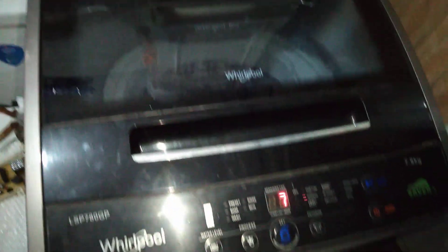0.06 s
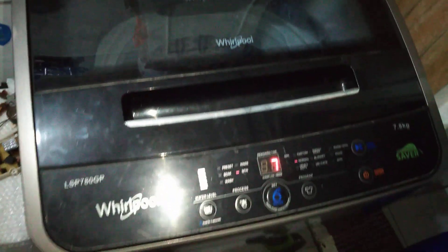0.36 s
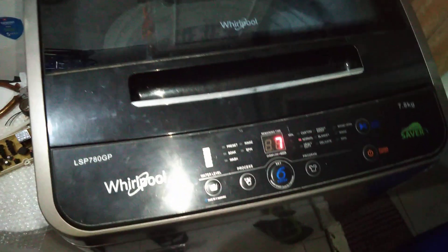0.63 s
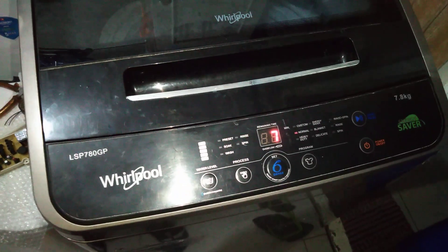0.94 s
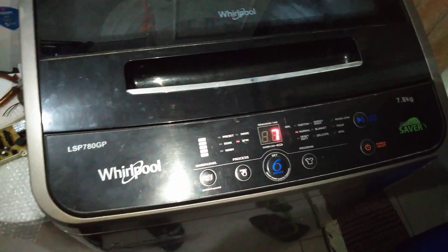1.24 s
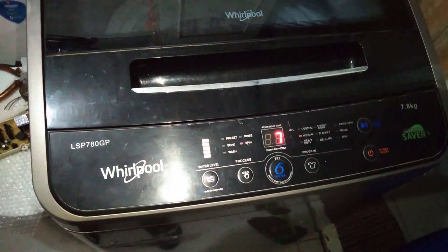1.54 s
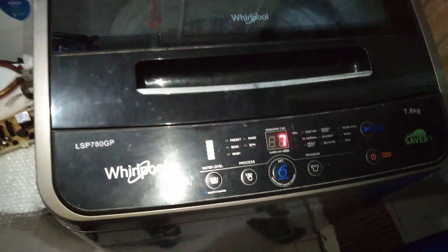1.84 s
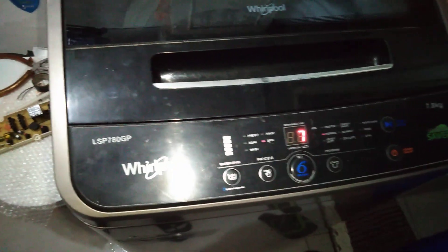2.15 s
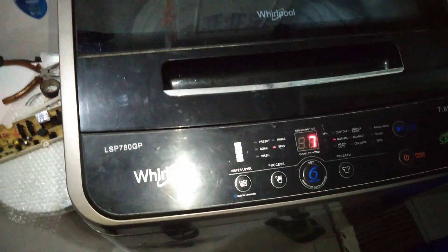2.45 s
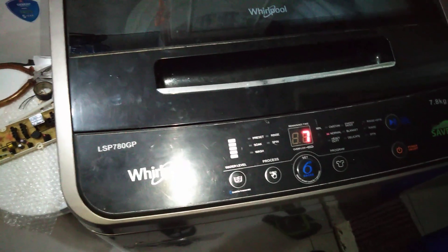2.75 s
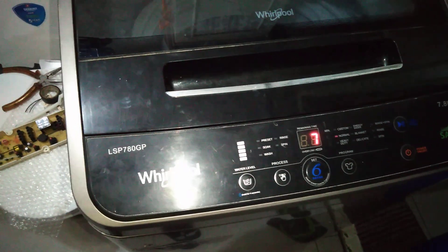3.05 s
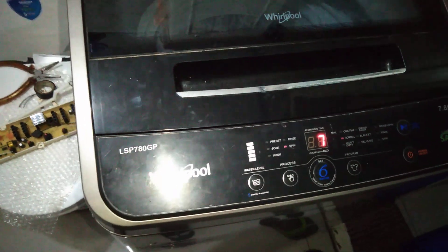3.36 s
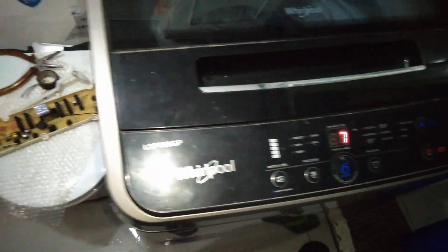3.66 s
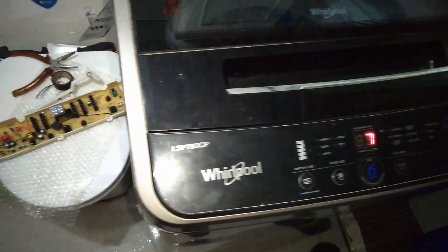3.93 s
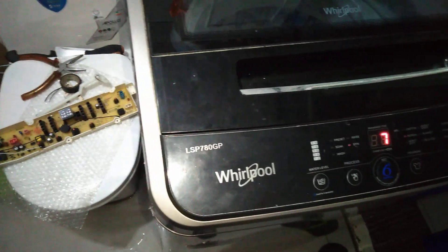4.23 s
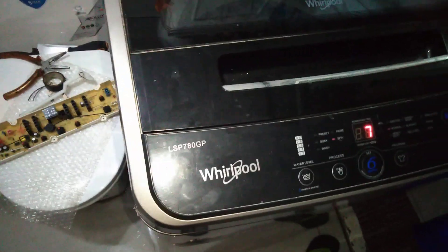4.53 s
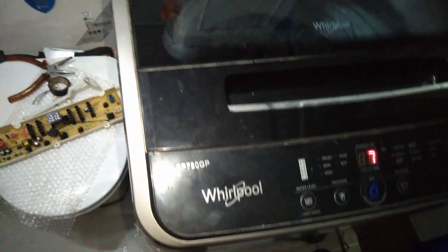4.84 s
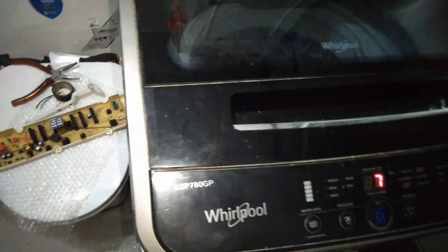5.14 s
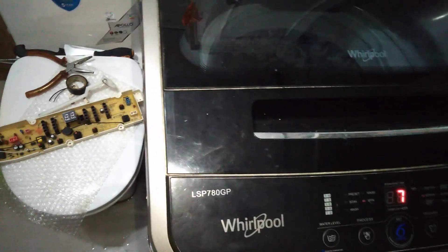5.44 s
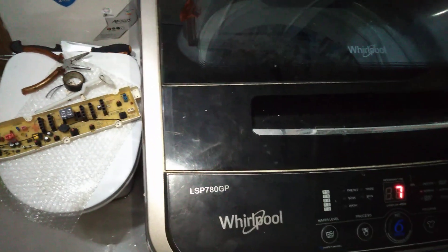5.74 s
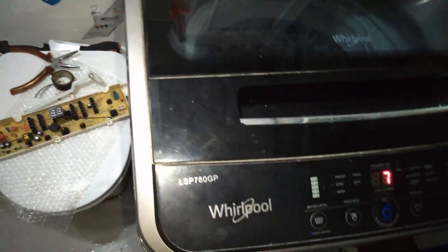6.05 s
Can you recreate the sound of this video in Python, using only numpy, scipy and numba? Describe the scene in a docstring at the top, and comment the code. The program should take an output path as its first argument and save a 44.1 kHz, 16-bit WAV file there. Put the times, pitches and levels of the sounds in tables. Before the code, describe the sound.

Heard from above a washing machine in a small room with hard walls, drain water gushes and slaps onto the wet floor. The hose rumbles in surges, with deep glugs and a very quiet motor hum. Halfway through, the stream weakens into a lighter, sputtering trickle that nearly stops twice and picks up again, with separate glugs sounding between the drips and splashes.

```python
"""Water from a draining top-load washing machine splashes on the wet floor of a small hard-walled room.
Each splash traps air bubbles, and each bubble rings like a tiny bell: the smaller, the higher.
Air pockets churn in the hose, big bubbles glug and the motor hums, all heard from above the lid.
After three seconds the flow eases to a patter with single glugs."""
import sys
import numpy as np
from scipy import signal
from scipy.fft import rfft, irfft, next_fast_len
from scipy.io import wavfile
from scipy.ndimage import uniform_filter1d
from numba import njit

SR = 44100
rng = np.random.default_rng(int(sys.argv[2]) if len(sys.argv) > 2 else 0)


def to_wav(sig):
    """Store sig (one row per channel, or 1-D mono) as 16-bit WAV at the path in sys.argv[1].

    Samples outside -1..1 are clipped; the rate is SR.
    """
    pcm = np.clip(np.atleast_2d(sig), -1, 1) * 32767
    pcm = np.round(pcm).astype(np.int16)
    wavfile.write(sys.argv[1], SR, pcm.T)  # frames by channels


N = 268569
TIME = np.arange(N) / SR

# the outflow, which thins as the tub empties and twice nearly fails: time_s, flow_share (1 is full)
FLOW = [(0, 0.85), (1.45, 1), (2.2, 0.73), (2.8, 0.32), (3.2, 0.32), (4.15, 0.29), (4.36, 0.15),
        (4.42, 0.01), (4.6, 0.25), (4.92, 0.5), (5.36, 0.07), (5.49, 0), (5.6, 0.23), (6.09, 0.22)]
# pitch of the largest bubbles the stream traps; each gush pulls it down: time_s, pitch_hz
LOWEST_PITCH = [(0, 2420), (.19, 2400), (.27, 1850), (.35, 1600), (.46, 2500), (.58, 2280), (.66, 1470),
                (.77, 1560), (.85, 2400), (.9, 1850), (1.06, 2010), (1.11, 1440), (1.35, 1500),
                (1.43, 2350), (1.57, 2320), (1.7, 1770), (1.85, 1900), (1.93, 1490), (2.1, 1950),
                (2.3, 1600), (2.65, 1750), (2.88, 2730), (3.05, 3270), (3.4, 2600), (3.7, 2500),
                (3.86, 5300), (3.95, 2210), (4.3, 2630), (4.39, 5570), (4.71, 6000), (4.8, 1760),
                (5.03, 2040), (5.25, 5250), (5.32, 2920), (5.48, 6270), (5.56, 3000), (5.78, 2650),
                (5.96, 4750)]
# level of the coarse bubbles, mostly faint once the hose runs half empty: time_s, level_db
COARSE_LEVEL = [(0, -36), (.14, -41), (.3, -36), (.52, -40.5), (.72, -34.5), (1.05, -34), (1.22, -35.5),
                (1.3, -41), (1.5, -37), (1.95, -34.5), (2.2, -37), (2.45, -42), (2.7, -48), (2.92, -44),
                (3.04, -68), (3.8, -54), (4.45, -51.5), (4.68, -40.5), (4.88, -42), (5.03, -56),
                (5.45, -67), (6.09, -56)]
# level of the high crackle of the finest droplets: time_s, level_db
FIZZ_LEVEL = [(0, -40), (.1, -49), (.25, -44), (.48, -50), (.55, -46), (.67, -57), (.8, -42), (.97, -54),
              (1.15, -54), (1.35, -43), (1.5, -40.5), (1.95, -53), (2.04, -42), (2.35, -52), (2.67, -51.5),
              (3.1, -49), (3.25, -48), (3.52, -48), (3.6, -71), (3.67, -40), (3.76, -49), (3.92, -47),
              (4.2, -48), (4.29, -68), (4.36, -46), (4.44, -56), (4.52, -44.5), (4.78, -53), (4.97, -50),
              (5.2, -50.5), (5.46, -55), (5.58, -45.5), (5.75, -54), (5.8, -48), (6.09, -54)]
# loud slaps of water, each a cloud of bubbles: start_s, level_db, centre_hz, spread_octaves
SLAPS = [(.002, -32.5, 7550, 0.3), (.167, -34, 6840, 0.2), (0.2, -34, 4590, 0.44), (.258, -47, 2310, 0.11),
         (.328, -38, 2267, .15), (0.331, -31.5, 8280, 0.25), (.366, -34.5, 3350, 0.013),
         (0.417, -33.5, 6760, .15), (0.485, -56.5, 1530, 0.037), (.55, -33.5, 9450, 0.12),
         (0.557, -54, 1650, 0.044), (.586, -33.5, 6500, 0.11), (.65, -33.5, 2710, 0.19),
         (0.662, -45, 1625, 0.071), (0.755, -28.5, 5320, 0.31), (0.763, -37, 2640, 0.056),
         (0.823, -29, 7560, 0.22), (0.833, -28.5, 3520, 0.078), (0.883, -32.5, 2490, 0.2),
         (.955, -50, 2170, 0.053), (1.017, -36, 2460, 0.14), (1.083, -28.5, 8330, 0.26),
         (1.087, -42.5, 1625, 0.07), (1.116, -33, 10500, 0.053), (1.156, -36, 2275, 0.047),
         (1.195, -46.5, 1583, 0.074), (1.234, -46, 2300, 0.46), (1.32, -47.5, 1800, .15),
         (1.33, -31, 6400, 0.39), (1.378, -26, 5580, 0.21), (1.564, -33.5, 7460, 0.31),
         (1.593, -32, 2440, 0.15), (1.662, -31.5, 5960, 0.42), (1.692, -35, 2333, 0.23),
         (1.751, -31, 7700, 0.24), (1.777, -37, 2243, 0.082), (1.929, -36.5, 1857, 0.12),
         (2.044, -53, 2750, 0.25), (2.149, -34, 7580, 0.3), (2.163, -36.5, 2360, 0.083),
         (2.238, -35, 5900, 0.24), (2.287, -39, 2340, 0.07), (2.399, -43.5, 1644, 0.12),
         (2.476, -32, 6040, 0.54), (2.547, -34.5, 7940, 0.27), (2.601, -38.5, 1990, 0.16),
         (2.648, -29, 8650, 0.097), (2.681, -44, 2166, 0.15), (2.692, -43.5, 4440, 0.2),
         (2.755, -32, 8500, 0.084), (2.76, -47.5, 2610, 0.038), (2.823, -51, 1490, 0.021),
         (2.824, -46, 1990, 0.012), (2.825, -51, 3000, 0.12), (2.839, -37, 8700, 0.18),
         (2.858, -45.5, 4700, 0.16), (2.931, -34.5, 8570, 0.19), (2.935, -44.5, 4180, 0.1),
         (2.96, -38, 6380, 0.075), (3.042, -41, 7380, 0.33), (3.095, -50.5, 5250, 0.073),
         (3.134, -42, 9500, .12), (3.162, -52.5, 3125, 0.078), (3.165, -47, 6620, .05),
         (3.255, -46.5, 4250, 0.16), (3.26, -46, 7160, .06), (3.32, -46, 6240, 0.085),
         (3.38, -45.5, 4400, 0.2), (3.473, -46, 5530, 0.13), (3.643, -48.5, 3150, 0.17),
         (3.747, -34.5, 7120, 0.23), (3.776, -45.5, 2860, 0.12), (3.815, -47, 12600, 0.051),
         (3.895, -38.5, 10500, 0.086), (3.9, -48.5, 2260, 0.037), (3.948, -42.5, 2800, 0.21),
         (4.016, -41, 5230, 0.2), (4.166, -36.5, 6470, 0.2), (4.187, -43, 2980, 0.064),
         (4.223, -48, 2570, 0.04), (4.239, -37.5, 5970, 0.089), (4.244, -42, 8870, 0.069),
         (4.312, -40.5, 9370, 0.056), (4.327, -46, 2880, 0.23), (4.466, -36, 9480, 0.21),
         (4.536, -46.5, 3600, 0.014), (4.547, -33.5, 8020, 0.24), (4.675, -34.5, 8000, 0.18),
         (4.8, -43, 3900, 0.51), (4.828, -33.5, 9300, 0.053), (4.864, -48, 4970, 0.27),
         (4.951, -46.5, 2300, 0.125), (4.992, -38.5, 6370, .2), (5.025, -43.5, 4580, 0.16),
         (5.138, -44, 2915, 0.19), (5.148, -38, 7700, 0.21), (5.289, -49, 3740, 0.33),
         (5.306, -42, 9400, 0.15), (5.405, -50, 6120, 0.02), (5.52, -40, 9300, 0.24),
         (5.538, -43.5, 3810, 0.21), (5.563, -36, 7500, 0.15), (5.731, -40, 5730, 0.37),
         (5.768, -44, 2806, 0.021), (5.775, -36, 10150, 0.13), (5.82, -37, 8100, 0.072),
         (5.918, -45, 6200, 0.087), (5.987, -49.5, 4570, 0.013), (6.035, -25.5, 6400, 0.11)]
# sheets of water that land flat and trap no air: start_s, level_db, lowest_hz
SMACKS = [(0.49, -26, 4500), (0.759, -44, 3500), (0.827, -34.5, 2960), (1.084, -43, 5940),
          (1.156, -31, 2300), (1.38, -36, 4530), (1.414, -28.5, 5340), (1.876, -30, 2200),
          (2.242, -57, 3000), (2.4, -34.5, 2070), (2.647, -43, 7200), (3.662, -48, 6300),
          (3.897, -47, 8000), (3.95, -37.5, 5970), (4.947, -31.5, 6560)]
# single bubbles: big ones in the hose and drain, and small ones ringing high in the splashing: start_s,
# peak_db, pitch_hz, ring_s (time to fade by 60 dB)
GLUGS = [(.074, -26, 134.8, 0.32), (0.343, -32, 156.4, 0.6), (0.364, -36, 243.6, 0.14),
         (0.768, -44, 423, 0.28), (.875, -48.5, 498, .13), (1.145, -50.5, 444, 0.11),
         (1.222, -39, 161, 0.05), (1.391, -40, 213, 0.042), (1.454, -46, 430, 0.12),
         (1.805, -50.5, 470, 0.064), (1.93, -50, 449, 0.081), (2.03, -40.5, 820, 0.018),
         (2.3, -53.5, 427, 0.1), (2.405, -45.5, 870, 0.026), (2.619, -39, 840, 0.013),
         (2.825, -52, 866, 0.21), (3.37, -56.5, 629, 0.55), (3.68, -39, 112.6, 0.42),
         (3.71, -48, 1700, .06), (3.745, -49, 1580, 0.052), (3.785, -48, 1510, 0.071),
         (3.986, -40, 411.6, 0.26), (4.106, -46.5, 490, 0.065), (4.107, -44, 119, 0.24),
         (4.427, -36, 120, 0.051), (4.5, -45, 1750, 0.051), (4.522, -44, 2043, 0.027),
         (4.573, -47, 402, 0.06), (4.835, -44, 2190, 0.051), (4.872, -42.5, 408, 0.27),
         (4.89, -41.5, 1960, .06), (4.953, -38.5, 1918, 0.05), (4.985, -44, 2150, 0.061),
         (5.092, -41, 388, 0.14), (5.182, -39.5, 123.2, 0.35), (5.432, -43.5, 366, 0.6),
         (5.699, -36, 116.6, 0.44), (5.94, -35, 119.8, 0.39)]
# surges of air through the hose: start_s, length_s, level_db
SURGES = [(0.015, 0.25, -34), (0.312, 1.08, -34.5), (1.999, 0.18, -39.5), (2.327, 0.4, -43)]
# short sharp ticks: start_s, level_db, length_s, pitch_hz, spread_octaves
TICKS = [(3.245, -38.5, .003, 5400, .6), (3.531, -37, .01, 7600, .12), (4.434, -46, .012, 7000, .7)]
# tones of the motor's hum: pitch_hz, level_db
HUM_TONES = [(119.5, -61), (231.5, -76.5)]
# moments when the whole sound sinks: start_s, end_s, gain_db
DIPS = [(3.539, 3.648, -13.5), (3.725, 3.735, -18), (4.435, 4.46, -3)]

# resonances, the pitches at which the hose and tub like to ring: pitch_hz, width_hz, gain_db
HOSE_RESONANCES = [(79.6, 10, 1), (99.35, 4.3, 8), (117.25, 6.8, 11.5), (154.7, 10.5, 0)]
# narrow resonances of the room: pitch_hz, width_hz, gain_db
ROOM_RESONANCES = [(1530, 71, 6.5), (1608, 43, 3.5), (1802, 17, 3.5), (2018, 52, 1), (2190, 110, -2.5),
                   (2385, 81, -4.5), (2445, 34, -3)]

# tone colour (how much each pitch is turned up or down) of the fine spray: pitch_hz, gain_db
SPRAY_COLOUR = [(2500, -45), (3200, -25), (4300, -4.5), (6000, 4.5), (7500, 10.5), (9500, 2), (11500, -9.5),
                (13800, -17), (15600, -7)]
# colour of the coarser bubbles: pitch_hz, gain_db
COARSE_COLOUR = [(900, -48), (1330, -19), (1570, -0.5), (1900, 2.5), (2400, 9.5), (3000, 6), (4000, 8.5),
                 (5500, 4.5), (8000, 34)]
# colour of the low gurgling: pitch_hz, gain_db
GURGLE_COLOUR = [(220, 30), (330, -7.5), (410, 1), (600, -8), (850, 0.5), (1000, -3.5), (1300, -8)]
# colour of separate drops: pitch_hz, gain_db
TRICKLE_COLOUR = [(2500, 5), (3200, -2.5), (4500, 3), (6500, 2.5), (9000, 8), (11000, 6)]
# colour of the bubbles in a slap: pitch_hz, gain_db
SLAP_COLOUR = [(1100, -40), (1450, -2.5), (2300, 0), (9500, 8.5), (11500, -0.5), (14000, -13)]
# colour of the hiss of water hitting the floor: pitch_hz, gain_db
SMACK_COLOUR = [(1500, 7), (4500, 1), (9800, 2.5), (11800, -14), (13800, -18), (15400, -17)]
# colour of the finest droplets: pitch_hz, gain_db
FIZZ_COLOUR = [(3500, -54), (6500, -22), (9500, 9.5), (11500, 2.5), (13800, -1), (15600, 0)]
# colour of the hose wall: pitch_hz, gain_db
HOSE_COLOUR = [(30, 15), (60, -48), (74, -1), (160, -2.5), (195, -3), (240, 1), (600, 11)]
# gentle overall colour of the splashing water: pitch_hz, gain_db
WATER_COLOUR = [(1000, -2), (1550, -2.5), (2400, -2), (3000, -1)]
# colour of the room's air: pitch_hz, gain_db
AIR_COLOUR = [(20, -20), (60, -5.5), (150, -12.5), (300, -13.5), (700, -22), (1500, -18), (4000, -22),
              (11000, -28), (15000, -26.5)]


def stream(spray_db=-36.5, gurgle_db=-61):
    """The running outflow: fine spray, coarser bubbles and gurgling; drops stand out as it thins."""
    flow = curve(FLOW)
    fine = spray(flow) * undb(spray_db) * flow ** 0.54
    coarse = patter(1400, 6000, cycles=70, scatter_db=3.8, flow=flow, count=2000)
    coarse = steady(colour(coarse, COARSE_COLOUR), 0.17) * undb(curve(COARSE_LEVEL))
    gurgle = patter(290, 1300, cycles=45, scatter_db=5, flow=flow, count=220)
    gurgle = steady(colour(gurgle, GURGLE_COLOUR), 0.15) * undb(gurgle_db) * flow ** 0.14
    return cut_below(fine + coarse + trickle(flow), curve(LOWEST_PITCH)) + gurgle


def spray(flow, mist_db=-4, flicker_db=2, finest_hz=6220):
    """Small bubbles ring, in a mist of tiny impacts that trap no air."""
    bubbles = patter(3005, 16320, cycles=154, scatter_db=6.5, flow=flow, count=7000)
    bubbles = steady(colour(bubbles, SPRAY_COLOUR), 0.056)
    mist = colour(spatter(chance=0.008, scatter_db=6, direct_db=-4.5), SPRAY_COLOUR)
    both = bubbles + unit(mist) * undb(mist_db + 2 * wander(29)) * flow
    # a thin stream traps only the finer bubbles, so the lower pitches fade faster
    high = colour(both, [(finest_hz * .85, -40), (finest_hz, 0)])
    low = (both - high) * flow ** 0.56
    return (high + low) * spurts() * undb(flicker_db * wander(13))


def spurts(lull_db=-3, lull_s=0.11):
    """Gain of the spray: the stream holds back just before each slap or smack and returns with it."""
    hits_s = np.append(np.sort([row[0] for row in SLAPS + SMACKS]), np.inf)
    wait_s = hits_s[np.searchsorted(hits_s, TIME)] - TIME
    lull = np.clip(1 - wait_s / lull_s, 0, 1)
    return undb(lull_db * uniform_filter1d(lull, SR // 200))


def trickle(flow, gain_db=-43, breakup_flow=0.53):
    """The thin stream breaks into drops, each with one bubble that rings freely."""
    drops = patter(2600, 10500, cycles=190, scatter_db=3.5, flow=np.sqrt(flow), count=380)
    broken = np.clip(2 * (1 - flow / breakup_flow), 0, 1)
    return steady(colour(drops, TRICKLE_COLOUR), 0.16) * undb(gain_db) * broken * np.sqrt(flow)


def patter(low_hz, high_hz, cycles, scatter_db, flow, count):
    """Random bubbles, some far louder than the rest, at three landing spots with their own echoes."""
    out = 0
    for spot in range(3):
        when, height, life, luck, lottery = rng.random((count, 5)).T
        starts = (when * N).astype(np.int64)
        hz = low_hz * (high_hz / low_hz) ** height
        # the smallest bubbles are the most alike in strength
        strengths = undb(-scatter_db * (1 - height ** 4 / 2) * np.log(luck + .04)) * hz / high_hz
        # a stronger stream traps more bubbles, but its swirling stops each one sooner
        trapped = lottery < flow[starts]
        ringing = cycles * (0.16 + life) / (1 + 2 * flow[starts])
        dry = ring_bubbles(N, starts, hz, ringing, strengths * trapped, rise=0.01, swell_cycles=6.5)
        out = out + irfft(rfft(dry) * rfft(room_echo(), N), N)
    return out


def splashes(hiss_db=-17.5):
    """Slaps trap clouds of bubbles and hiss a little as they land; flat sheets only smack."""
    out = np.zeros(N)
    for start_s, level_db, centre_hz, spread in SLAPS:
        add(out, start_s, undb(level_db) * bubble_cloud(centre_hz, spread))
        add(out, start_s, undb(level_db + hiss_db) * smack(centre_hz))
    for start_s, level_db, lowest_hz in SMACKS:
        add(out, start_s, undb(level_db) * smack(lowest_hz))
    return out


def bubble_cloud(centre_hz, spread, count=45, cycles=85., gather_s=0.012):
    """A few bubbles ring as a slap lands, and weaker ones over the next hundredths of a second."""
    lateness, luck = rng.exponential(size=(2, count))
    lateness = np.maximum(lateness - .2, 0)
    starts = (gather_s * lateness * SR).astype(np.int64)
    octaves = spread * rng.permutation(np.linspace(-1.7, 1.7, count))
    octaves += 0.045 * rng.standard_normal(count)
    hz = np.minimum(centre_hz * 2 ** octaves, .45 * SR)
    colour_db = np.interp(hz, *np.transpose(SLAP_COLOUR))
    near_centre = np.exp(-(octaves / (spread + 0.0078)) ** 2 / 6)
    strengths = undb(4 * luck - 3 * lateness + colour_db) * near_centre * np.sqrt(hz)
    ringing = np.full(count, cycles)
    dry = ring_bubbles(SR // 4, starts, hz, ringing, strengths, rise=0.01, swell_cycles=1.37)
    echoed = signal.fftconvolve(dry, room_echo(early_db=2))
    return echoed / np.std(echoed[:SR // 25])


@njit
def ring_bubbles(length, starts, hz, cycles, strengths, rise, swell_cycles):
    """Each bubble is a sine wave that swells, rises in pitch and fades by 60 dB over its cycles."""
    out = np.zeros(length)
    for k in range(len(starts)):
        life = int(cycles[k] * SR / hz[k])
        step = 2 * np.pi * hz[k] / SR
        # a complex number that turns and shrinks a little each sample traces a fading sine
        wave = strengths[k] + 0j
        turn = np.exp(1j * step - np.log(1000) / life)
        glide = np.exp(1j * step * rise / life)
        muted, release = 1., np.exp(-hz[k] / SR / swell_cycles)
        for i in range(starts[k], starts[k] + life):
            wave *= turn
            turn *= glide
            muted *= release
            out[i % length] += wave.imag * (1 - muted) ** 2
    return out


def smack(lowest_hz, fade_s=0.067):
    """Water bursts on the floor: a broad crackle that dies quickly, and the room after it."""
    t = TIME[:SR // 6]
    burst = crackle(len(t), chance=0.082, scatter_db=4) * fade(t, fade_s)
    dry = colour(colour(burst, SMACK_COLOUR), [(lowest_hz * .6, -60), (lowest_hz, 0)])
    echoed = signal.fftconvolve(dry, room_echo(early_db=-4))
    return echoed / np.std(echoed[:SR // 25])


def fizz(gain_db=2, flurry_db=2.5):
    """The finest droplets land in quick flurries and crackle."""
    drops = unit(colour(spatter(chance=.02, scatter_db=3, direct_db=-6), FIZZ_COLOUR))
    return drops * undb(curve(FIZZ_LEVEL) + gain_db + flurry_db * wander(60))


def spatter(chance, scatter_db, direct_db):
    """Separate tiny impacts, heard both straight and through the room."""
    impacts = crackle(N, chance, scatter_db)
    return signal.fftconvolve(impacts, room_echo())[:N] + undb(direct_db) * impacts


def crackle(length, chance, scatter_db):
    """Tiny impacts of uneven strength; every sample has the same chance of holding one."""
    lottery, luck, coin = rng.random((3, length))
    strengths = undb(-scatter_db * np.log(luck + 0.0096))
    return unit((lottery < chance) * np.sign(coin - .5) * strengths)


def glugs(swell_s=0.0048, rise=0.04, wobble_hz=12, echo_db=1):
    """Single bubbles, big and small, swell, wobble and ring out into the room."""
    out, t = np.zeros(N), TIME[:SR // 2]
    for start_s, peak_db, hz, ring_s in GLUGS:
        pitch_hz = hz * (1 + rise * t / ring_s) + wobble_hz * wander(155.6, len(t))
        loudness = (1 - np.exp(-t / swell_s)) ** 2 * fade(t, ring_s)
        dry = loudness * np.sin(2 * np.pi * np.cumsum(pitch_hz) / SR)
        echo = signal.fftconvolve(dry, room_echo())[:len(t)]
        glug = unit(dry) + undb(echo_db) * unit(echo)
        add(out, start_s, undb(peak_db) * glug / np.abs(glug).max())
    return out


def hose(count=600, full_flow_hz=100.5, churn_db=-46, half_empty_s=2.99):
    """Air pockets ring the full hose in surges, deepen as the flow falls and stop as it empties."""
    attack_s, release_s, sag_db_per_s = 0.076, 0.057, 6
    when, strengths = rng.random((2, count))
    starts = (when * N).astype(np.int64)
    hz = full_flow_hz * curve(FLOW)[starts] ** 0.14 * 2 ** (0.43 * rng.standard_normal(count))
    cycles = np.full(count, 9.)
    pockets = ring_bubbles(N, starts, hz, cycles, strengths, rise=0.024, swell_cycles=0.32)
    rumble = colour(irfft(rfft(pockets) * resonance(HOSE_RESONANCES, N), N), HOSE_COLOUR)
    loudness = undb(churn_db) * np.interp(TIME - half_empty_s, [0, release_s], [1, 0])
    for start_s, length_s, level_db in SURGES:
        age_s = TIME - start_s
        surge = np.interp(age_s, [0, attack_s, length_s, length_s + release_s], [0, 1, 1, 0])
        loudness += surge * undb(level_db - sag_db_per_s * age_s)
    return steady(rumble, 0.07) * loudness


def ticks():
    """Short sharp ticks, each a brief burst of noise around one pitch, with the room's echo."""
    out = np.zeros(N)
    for start_s, level_db, length_s, hz, spread in TICKS:
        length = int(length_s * SR)
        burst = np.pad(rng.standard_normal(length), (0, SR // 100))
        band = [(hz / 4 ** spread, -40), (hz / 2 ** spread, 0),
                (hz * 1.5 ** spread, 0), (hz * 3 ** spread, -30)]
        tick = colour(burst, band)
        add(out, start_s, undb(level_db) * tick / np.std(tick[:length]))
    return out + signal.fftconvolve(out, room_echo())[:N]


def motor(waver_db=3.5):
    """The motor's low hum wavers slightly."""
    waver = undb(waver_db * wander(12))
    tones = [undb(db) * np.sin(2 * np.pi * hz * TIME + 0.67 * wander(4)) for hz, db in HUM_TONES]
    return waver * np.sqrt(2) * sum(tones)


def cabinet_gap(water, ring_db=3, ring_s=.075):
    """The thinning stream drips into the gap behind the cabinet, which rings briefly at many pitches."""
    t = TIME[:SR // 8]
    echo = unit(rng.standard_normal(len(t)) * fade(t, ring_s)) / np.sqrt(len(t))
    treble = colour(water, [(2200, -40), (2900, 0), (9000, 0), (11500, -20)])
    ringing = undb(ring_db) * np.clip(1 - curve(FLOW), 0, 1)
    direct = treble / np.sqrt(1 + ringing ** 2)
    return water - treble + direct + signal.fftconvolve(direct * ringing, echo)[:N]


def room_ring(water, direct_share=0.99):
    """Narrow room resonances: a few steady pitches ring under the splashing."""
    size = next_fast_len(N + SR // 2, True)
    spectrum = rfft(water, size) * (resonance(ROOM_RESONANCES, size) + direct_share)
    return colour(irfft(spectrum, size)[:N], WATER_COLOUR)


def room_echo(early_db=-6, direct_db=-12, low_fade_s=.39, high_fade_s=.33):
    """The room's answer to a click: a weak direct path, early echoes off cabinet and floor, a tail."""
    t = TIME[:SR // 3]
    noise = rng.standard_normal(len(t))
    low = signal.lfilter(*signal.butter(2, 3500, "low", fs=SR), noise)
    high = signal.lfilter(*signal.butter(2, 3500, "high", fs=SR), noise)
    tail = low * fade(t, low_fade_s) - high * fade(t, high_fade_s)
    early = 1 + undb(early_db) * fade(t, .1)
    echo = unit(tail * early) / np.sqrt(len(t))
    echo[0] += undb(direct_db)
    return echo


def room_air(level_db=-59.5):
    """The room's air is a quiet, even rush."""
    return unit(colour(rng.standard_normal(N), AIR_COLOUR)) * undb(level_db)


def undb(db):
    """Turn decibels into a number to multiply by."""
    return 10 ** (np.asarray(db) / 20)


def unit(x):
    """Scale to an average strength (rms) of 1."""
    return x / np.sqrt(np.mean(x ** 2) + 1e-20)


def curve(table):
    """Join a table's (time_s, value) points with straight lines, one value per sample."""
    return np.interp(TIME, *np.transpose(table))


def fade(t, fade_s):
    """Die away by 60 dB every fade_s seconds."""
    return np.exp(-np.log(1000) * t / fade_s)


def wander(rate_hz, length=N):
    """Drift smoothly at random, by about 1 either way."""
    hold = int(SR / rate_hz)
    steps = np.repeat(rng.standard_normal(length // hold + 1), hold)
    return unit(uniform_filter1d(steps, hold)[:length])


def add(out, start_s, x):
    """Mix x into out from start_s on."""
    i = int(np.clip(start_s * SR, 0, N - 1))
    out[i:i + len(x)] += x[:N - i]


def steady(x, window_s):
    """Even out slow swells and keep the quick grain."""
    x = unit(x)
    return x / np.sqrt(uniform_filter1d(x ** 2, int(window_s * SR)) + 0.0029)


def colour(x, points):
    """Turn pitches up or down along an outline of (pitch_hz, gain_db) points."""
    hz, db = np.transpose(points)
    size = next_fast_len(len(x) + SR // 2, True)
    f = np.fft.rfftfreq(size, 1 / SR) + 1
    gain = undb(np.interp(np.log(f), np.log(hz), db))
    return irfft(rfft(x, size) * gain, size)[:len(x)]


def resonance(table, size):
    """How a hollow space with these resonances answers each pitch in a sound of size samples."""
    f = np.fft.rfftfreq(size, 1 / SR)
    return sum(undb(db) * f * width / (f * width + 1j * (f ** 2 - hz ** 2)) for hz, width, db in table)


def cut_below(x, edge_hz, steepness=22):
    """Remove the pitches below a moving edge."""
    f, t, frames = signal.stft(x, SR, nperseg=512)
    gain = 1 / np.sqrt(1 + (np.interp(t, TIME, edge_hz) / (f[:, None] + 1)) ** steepness)
    return signal.istft(frames * gain, SR, nperseg=512)[1][:N]


def scene():
    """Water, hose and motor over the quiet air of the room."""
    air = room_air()
    water = room_ring(cabinet_gap(stream() + splashes() + fizz()))
    return (water + ticks() + glugs() + hose() + motor() + air)[None]


def record(dry):
    """The level dips briefly three times, and the highest treble is cut."""
    top_hz = 15800
    dip_db = sum(db * ((TIME > start_s) & (TIME < end_s)) for start_s, end_s, db in DIPS)
    dipped = dry * undb(uniform_filter1d(dip_db, SR // 70))
    return signal.sosfilt(signal.ellip(10, .2, 80, top_hz, fs=SR, output="sos"), dipped)


dry = scene()
out = record(dry)
to_wav(out)
```